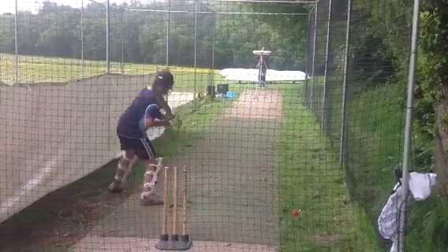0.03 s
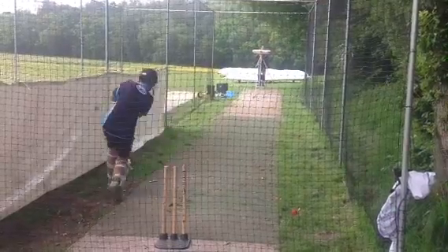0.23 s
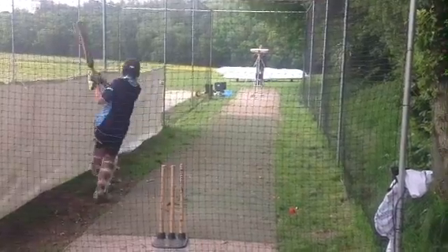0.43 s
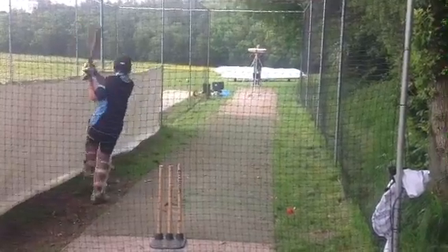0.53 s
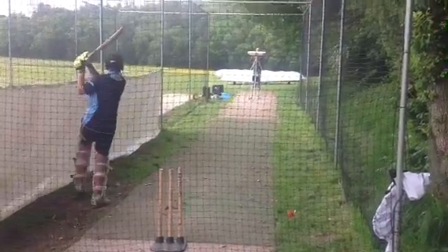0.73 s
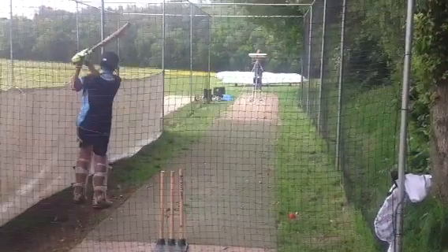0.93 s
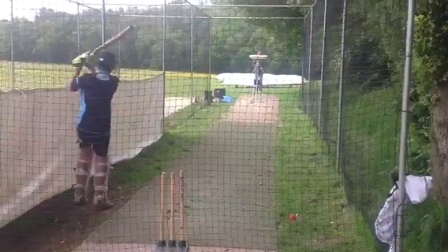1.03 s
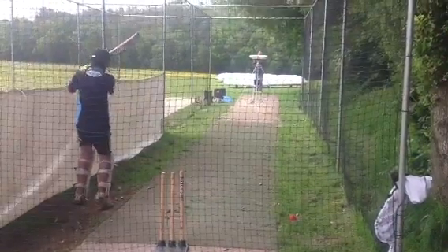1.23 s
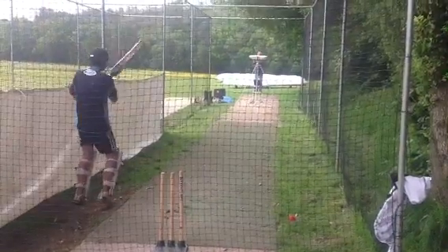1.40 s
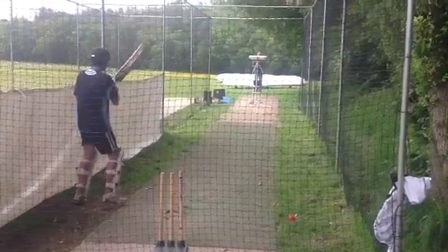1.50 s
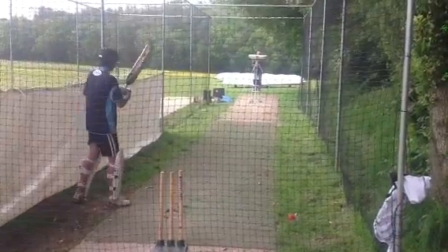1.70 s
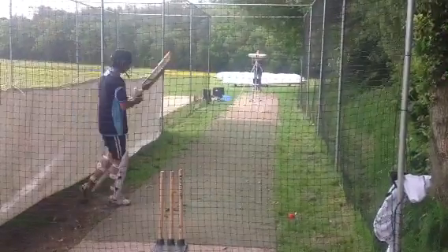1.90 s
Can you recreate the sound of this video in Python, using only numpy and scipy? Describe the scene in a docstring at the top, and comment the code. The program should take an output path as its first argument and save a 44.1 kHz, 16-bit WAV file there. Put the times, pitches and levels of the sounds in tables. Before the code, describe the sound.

A cricket bat cracks a ball into hissing, flapping netting, with faint birds around.

```python
"""Cricket shot in an outdoor net

A scuff of the stroke leads in; the ball rings the damped wood of the bat, close enough to overload
the microphone. It drags through the side netting, which hisses, snaps taut and flaps. The batter
rustles and steps softly. Small birds whistle from the trees over a quiet field."""
import sys
import numpy as np
from scipy import signal
from scipy.fft import rfft, irfft
from scipy.io import wavfile
from scipy.ndimage import uniform_filter1d

SR = 44100
rng = np.random.default_rng(int(sys.argv[2]) if len(sys.argv) > 2 else 0)


def transcribe(signal):
    """Save signal, clipped to [-1, 1], as a 16-bit WAV file at the path in sys.argv[1]."""
    frames = np.atleast_2d(signal).T
    limited = np.clip(frames, -1, 1)
    pcm = np.round(limited * 32767).astype(np.int16)
    wavfile.write(sys.argv[1], SR, pcm)


N = 85995
CONTACT_S = .00025  # attack of wood and cord modes
# Spectrum of the net's hiss and the bat's tick. Each row: frequency in Hz, relative density in dB.
HISS_SPECTRUM = [(60, -17), (300, 2), (900, -4), (1400, -4), (1950, 1), (2600, -10.5), (3600, -2.5),
                 (5000, -1), (6600, -2.5), (8800, 3.5), (11500, -3), (15000, -12.5)]


def undb(db):
    """Decibels to gain."""
    return 10 ** (np.asarray(db) / 20)


def clock():
    """Sample times in seconds."""
    return np.arange(N) / SR


def colour(x, spectrum):
    """Shape x by (Hz, dB) points; rms 1."""
    hz, db = np.array(sorted(spectrum)).T
    bins_hz = np.maximum(np.arange(N // 2 + 1) * SR / N, 1)
    gain = undb(np.interp(np.log(bins_hz), np.log(hz), db))
    shaped = irfft(rfft(x) * gain, N)
    return shaped / np.std(shaped)


def noise(spectrum):
    """Coloured noise; rms 1."""
    return colour(rng.standard_normal(N), spectrum)


def fade(start_s, t60_s):
    """Instant onset, exponential decay."""
    age_s = clock() - start_s
    return (age_s >= 0) * np.exp(-np.log(1000) * np.maximum(age_s, 0) / t60_s)


def swell(start_s, rise_s, hold_s, t60_s):
    """Linear rise, hold, exponential decay."""
    age_s = clock() - start_s
    decay = np.exp(-np.log(1000) * np.maximum(age_s - rise_s - hold_s, 0) / t60_s)
    return np.clip(age_s / rise_s, 0, 1) * decay


def ring(start_s, hz, rise_s, t60_s):
    """One damped mode."""
    return -np.sin(2 * np.pi * hz * (clock() - start_s)) * swell(start_s, rise_s, 0, t60_s)


def wander(rate_hz):
    """Smooth random motion; standard deviation 1."""
    width = max(int(SR / rate_hz), 1)
    smooth = uniform_filter1d(uniform_filter1d(rng.standard_normal(N), width), width)
    return smooth / np.std(smooth)


def field():
    """Open air with a distant, gently swelling rush."""
    # Each row: frequency in Hz, relative density in dB.
    rush_spectrum = [(18, -70), (30, -36), (43, -31), (77, -28), (108, -12), (230, -0.5), (359, -9.5),
                     (467, -9), (787, -9), (897, -3), (1510, -9), (1770, -4.5), (2550, -23), (4090, -17),
                     (5310, -25), (7080, -25.5), (7650, -22.5), (14300, -33), (15500, -36)]
    # Each row: time in seconds, level offset in dB.
    rush_trend = [(0, -1.5), (.8, -1), (1.15, 1.5), (1.5, 0), (1.95, 0.5)]
    level_db = -49.5 + np.interp(clock(), *np.array(rush_trend).T) + .5 * wander(rate_hz=6)
    return undb(level_db) * noise(rush_spectrum)


def birds():
    """Gliding whistles and a twitter echo in the trees, with more song far behind."""
    # Each row: start and length in seconds, first and last pitch in Hz, level in dB, waver fraction.
    notes = [(.028, .045, 5900, 4200, -49.5, .014), (.135, .022, 4500, 5000, -47, .01),
             (.57, .038, 6100, 4600, -51, .02), (.665, .06, 4400, 4520, -54, .005),
             (.682, .022, 4500, 5100, -51, .01), (.747, .06, 6200, 3800, -49.5, .015),
             (.87, .13, 8000, 7800, -55.5, .016), (.96, .07, 3650, 3500, -57, .025),
             (.975, .15, 1795, 1830, -49, .012), (1.054, .07, 5850, 3800, -46.5, .012),
             (1.32, .09, 6750, 6700, -55.5, .018), (1.398, .045, 4300, 3750, -55, .015),
             (1.545, .12, 4105, 4100, -58, .001), (1.588, .052, 6780, 6680, -61, .008),
             (1.637, .03, 5300, 4000, -52.5, .015), (1.884, .034, 5600, 4200, -52.5, .012)]
    # Distant song. Each row: frequency in Hz, relative density in dB.
    chorus_spectrum = [(1500, -32), (2800, -5), (3500, 3), (4600, -2), (5800, -0.5), (7000, -14),
                       (9000, -26), (15000, -41)]
    # Each row: time in seconds, level in dB.
    chorus_levels = [(0, -56), (.55, -53.5), (.82, -58.5), (.95, -59.5), (1.17, -56), (1.32, -61),
                     (1.55, -59), (1.75, -58), (1.95, -63.5)]
    t = clock()
    song = twitter()
    for start_s, length_s, from_hz, to_hz, db, waver in notes:
        progress = np.clip((t - start_s) / length_s, 0, 1)
        hz = from_hz * (to_hz / from_hz) ** progress * (1 + waver * wander(rate_hz=367))
        skewed = np.interp(progress, [0, .28, 1], [0, .5, 1])  # note peaks early
        envelope = np.abs(np.sin(np.pi * skewed)) ** .46
        song += undb(db) * envelope * np.sin(2 * np.pi * np.cumsum(hz) / SR)
    trees = rng.standard_normal(N) * fade(0, t60_s=.35)
    echo = signal.fftconvolve(song, trees / np.linalg.norm(trees))[:N]
    chorus = noise(chorus_spectrum) * undb(np.interp(t, *np.array(chorus_levels).T))
    return song + undb(-1) * echo + chorus


def batter():
    """The scuff of the stroke and soft rustles of clothes and pads."""
    # Each row: frequency in Hz, relative density in dB.
    scuff_spectrum = [(60, -36), (200, -7), (800, -6), (1800, -3), (2600, -7.5), (3600, -7.5),
                      (6000, -11.5), (8400, -4), (11000, -12.5), (15000, -25)]
    # Each row: start in seconds, length in seconds, level in dB.
    rustles = [(0.039, 0.057, -56), (0.633, 0.038, -55.5), (0.777, 0.077, -58), (1.08, .11, -55.5),
               (1.386, 0.16, -59.5)]
    envelope = undb(-42.5) * swell(start_s=.12, rise_s=.023, hold_s=.075, t60_s=.034)
    for start_s, length_s, db in rustles:
        progress = np.clip((clock() - start_s) / length_s, 0, 1)
        envelope += undb(db) * np.sin(np.pi * progress)
    return envelope * noise(scuff_spectrum)


def bat():
    """A hard contact rings the damped wood; ground and poles scatter the crack."""
    # Bat and ball. Each row: frequency in Hz, relative level in dB, T60 in seconds.
    modes = [(398, -43, 0.004), (712, -26.5, 0.069), (1009, -14.5, 0.013), (1500, 3.5, .0038),
             (1690, -24, 0.018), (1910, -8.5, 0.0048), (3005, -23.5, 0.013), (6170, -19, 0.011),
             (8420, -9.5, 0.0054)]
    # Each row: frequency in Hz, relative density in dB.
    scatter_spectrum = [(60, -24), (200, 4), (600, -4.5), (1000, 3), (1600, 1.5), (2050, -14), (2500, -4.5),
                        (3200, -5.5), (5000, -9), (15000, -22.5)]
    hit_s = .2138
    wood = sum(undb(db) * ring(hit_s, hz, CONTACT_S, t60_s) for hz, db, t60_s in modes)
    tick = undb(-5) * noise(HISS_SPECTRUM) * fade(hit_s, t60_s=.004)
    near_tail = undb(-17) * fade(hit_s, t60_s=.043)
    far_tail = undb(-31) * fade(hit_s, t60_s=.71)
    return undb(3.5) * wood + tick + (near_tail + far_tail) * noise(scatter_spectrum)


def netting():
    """The net slides over itself: knots rub in a dense hiss whose treble dies first."""
    knots_per_s, spread_db, split_hz = 30000, 1.1, 6300
    start_s, rise_s, hold_s = .22, .038, .0065
    sizes = undb(spread_db * np.minimum(rng.exponential(size=N), 4))
    rubs = rng.random(N) < knots_per_s / SR
    hiss = colour(rubs * sizes * rng.standard_normal(N), HISS_SPECTRUM)
    low = signal.sosfiltfilt(signal.butter(2, split_hz, fs=SR, output="sos"), hiss)
    body = low * swell(start_s, rise_s, hold_s, t60_s=.74)
    treble = (hiss - low) * swell(start_s, rise_s, hold_s, t60_s=.41)
    return undb(-21) * (body + treble)


def cords():
    """Net cords snap tight, each with a click and a short ring."""
    # Each row: start in seconds, ring level in dB, click level relative to the ring in dB.
    snaps = [(.2431, -18, -4), (.2472, -16, 4), (.2497, -20, -4), (.2588, -17, -6), (.2676, -22, 14.5)]
    # Each row: frequency in Hz, relative density in dB.
    click_spectrum = [(100, -16), (400, -6), (1500, -8), (4000, -4), (7000, 0), (11000, -1), (15000, -6),
                      (18000, -30)]
    click_noise = noise(click_spectrum)
    sound = np.zeros(N)
    for start_s, db, click_db in snaps:
        cord = ring(start_s, hz=1600, rise_s=CONTACT_S, t60_s=.012)
        click = undb(click_db) * click_noise * fade(start_s, t60_s=.005)
        sound += undb(db) * (cord + click)
    return sound


def sheet():
    """The taut side sheet stops the ball, flaps and flutters to rest; its deep bass is filtered out."""
    # Each row: start in seconds, pitch in Hz, level before the bass cut in dB, rise and T60 in seconds.
    flaps = [(.2672, 630, -14, .0006, .033), (.2699, 208, -2, .0035, .03), (.2815, 175, -19, .002, .08),
             (.2915, 305, -14, .007, .12), (.3125, 245, -17, .003, .08), (.346, 262, -25, .005, .13),
             (.373, 235, -26, .006, .12), (.427, 188, -30, .004, .12)]
    # Each row: frequency in Hz, relative density in dB.
    flutter_spectrum = [(40, -42), (90, -12), (125, -4.5), (165, 4), (240, -3), (300, -1), (380, -5.5),
                        (480, -8.5), (560, -18), (720, -11.5), (1000, -43), (2500, -51)]
    cut_hz = 119
    thumps = np.zeros(N)
    for start_s, hz, db, rise_s, t60_s in flaps:
        overtone = undb(-25.5) * ring(start_s, 1.6 * hz, rise_s, t60_s)
        thumps += undb(db) * (ring(start_s, hz, rise_s, t60_s) + overtone)
    envelope = swell(start_s=.266, rise_s=.0076, hold_s=0, t60_s=.68)
    flutter = undb(-22) * envelope * noise(flutter_spectrum)
    return signal.sosfilt(signal.butter(2, cut_hz, "high", fs=SR, output="sos"), thumps + flutter)


def steps():
    """Dull footfalls on the mat as the batter regains balance."""
    # Each row: start in seconds, level in dB.
    footfalls = [(.91, -46), (1.692, -50)]
    return sum(undb(db) * ring(start_s, hz=218, rise_s=.012, t60_s=.12) for start_s, db in footfalls)


def twitter():
    """A thin, high bird whose pitch and level dart about."""
    start_s, rise_s, dart_hz = 1.64, .09, 1200
    hz = 6600 * (1 + .09 * wander(dart_hz))
    envelope = np.clip((clock() - start_s) / rise_s, 0, 1) * wander(dart_hz)
    return undb(-59.5) * envelope * np.sin(2 * np.pi * np.cumsum(hz) / SR)


def scene():
    """All sources at one microphone."""
    return (bat() + batter() + steps() + netting() + cords() + sheet() + birds() + field())[None]


def record(dry):
    """The microphone flattens the crack's peaks and cuts the top."""
    ceiling, knee, top_hz = .68, 5, 15500
    clipped = dry / (1 + np.abs(dry / ceiling) ** knee) ** (1 / knee)
    return signal.sosfilt(signal.ellip(10, .2, 80, top_hz, fs=SR, output="sos"), clipped)


dry = scene()
out = record(dry)
transcribe(out)
```